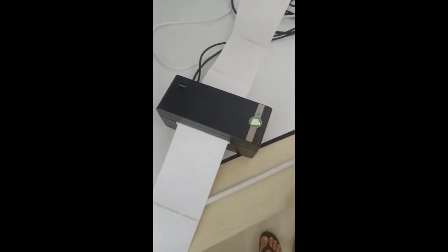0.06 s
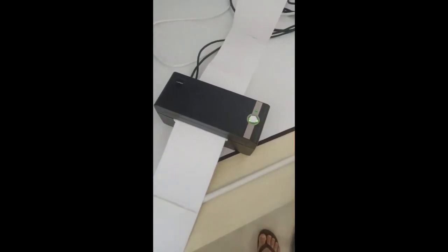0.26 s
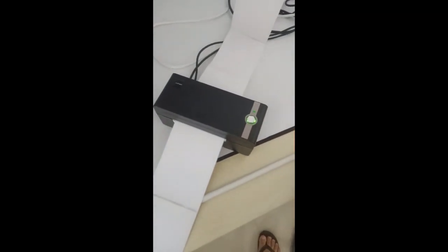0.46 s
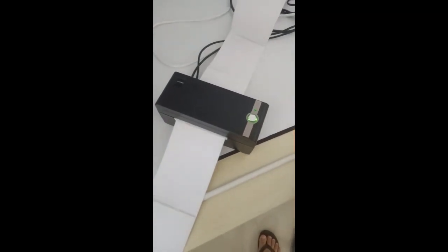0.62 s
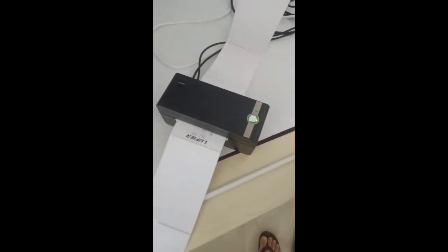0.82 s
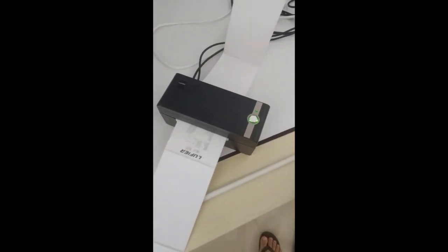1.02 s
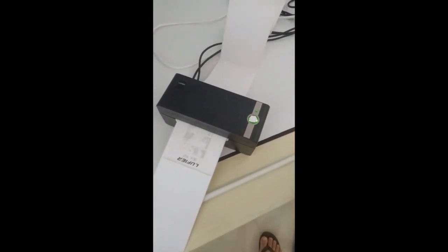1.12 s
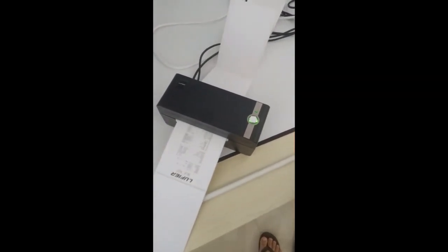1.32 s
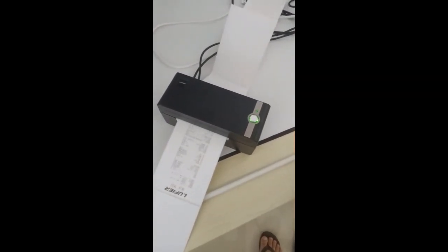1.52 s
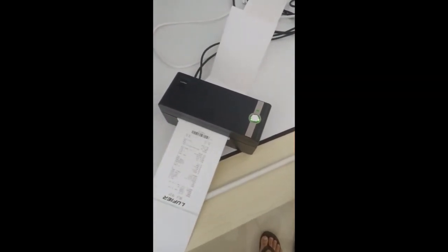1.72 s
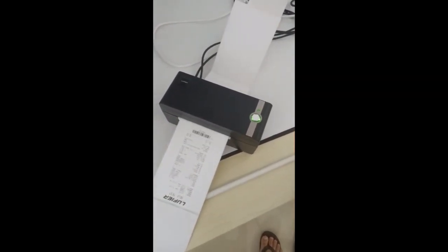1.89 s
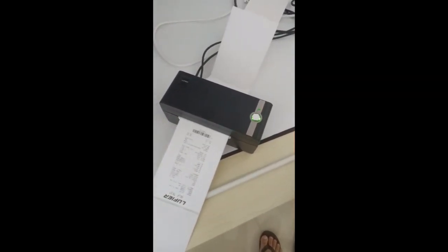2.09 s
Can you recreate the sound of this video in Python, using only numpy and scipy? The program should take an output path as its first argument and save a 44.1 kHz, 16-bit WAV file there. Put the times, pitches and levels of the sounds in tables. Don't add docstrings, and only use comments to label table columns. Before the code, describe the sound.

Small label printer whirs with a buzzing motor whine, feeding paper after rustles and dry clicks

```python
import sys
import numpy as np
from scipy import signal
from scipy.fft import rfft, irfft, next_fast_len
from scipy.io import wavfile
from scipy.ndimage import uniform_filter1d, map_coordinates

SR = 44100
rng = np.random.default_rng(int(sys.argv[2]) if len(sys.argv) > 2 else 0)


def store_wav(level_fs):
    pcm = np.round(np.clip(np.atleast_2d(level_fs), -1, 1) * 32767)
    wavfile.write(sys.argv[1], SR, pcm.T.astype(np.int16))


def gain_from_db(level_db):
    decades = np.asarray(level_db, float) / 20
    return 10 ** decades


N = 94815
T = np.arange(N) / SR
STEP_HZ, CYCLE_STEPS = 1197.7, 6
GEAR_STEPS, GEAR_MARK_S = 26, 1.456
START_S, STOP_S = .702, 1.79
# centre_hz, width_hz, level_db
SHEET_MODES = [(1330, 410, 2.5), (1604, 240, 5)]


def unit(x):
    return x / np.sqrt(np.mean(x ** 2) + 1e-20)


def along(points, hz):
    f, v = np.transpose(points)
    return np.interp(np.log(hz + 1), np.log(f + 1), v)


def level(rows):
    s, db = np.transpose(rows)
    return gain_from_db(np.interp(T, s, db, left=-120, right=-120))


def wobble(rate_hz):
    knots = rng.standard_normal(int(N * rate_hz / SR) + 4)
    return map_coordinates(knots, [T * rate_hz])


def filtered(x, response):
    m = next_fast_len(N + SR // 2)
    return irfft(rfft(x, m) * response(np.fft.rfftfreq(m, 1 / SR)), m)[..., :N]


def shape(points):
    return lambda hz: gain_from_db(along(points, hz))


def modes(table):
    def response(f):
        total = 0
        for k, (centre, width, db) in enumerate(table):
            damping = 1j * f * width
            total = total + (-1) ** k * gain_from_db(db) * damping / (centre * centre - f * f + damping)
        return total
    return response


def rush(colour, patchy_db):
    # hz, left_right_likeness
    likeness = [(60, 0.98), (180, 0.96), (350, 1), (700, 0.3), (1600, 0.1), (5000, 0.014)]
    z = signal.stft(rng.standard_normal((2, N + 512)), nperseg=512)[2]
    field = uniform_filter1d(rng.standard_normal(z.shape[1:]), size=5, axis=0)
    field = uniform_filter1d(field, size=6, axis=1)
    pair = signal.istft(z * gain_from_db(patchy_db * unit(field)), nperseg=512)[1][:, :N]

    def mid_side(hz):
        angle = np.arccos(np.clip(along(likeness, hz), 0, 1)) / 2
        return colour(hz) * np.array([np.cos(angle), np.sin(angle)])
    mid, side = filtered(pair, mid_side)
    return np.array([mid + side, mid - side]) / np.sqrt(np.mean(mid ** 2))


def desk(patchy_db):
    # centre_hz, width_hz, level_db
    desk_modes = [(43.6, 21, -6.5), (94.8, 14.9, 1.5), (139.8, 10.5, -1), (167.7, 16.5, -3)]
    return rush(lambda f: modes(desk_modes)(f) ** 2, patchy_db)


def room_floor():
    # hz, db_per_hz
    floor_colour = [(150, -15.5), (270, -8.5), (900, -16.5), (4200, -26), (5300, -40), (9500, -40),
                    (11800, -46), (12400, -61)]
    return gain_from_db(-63.5) * rush(shape(floor_colour), patchy_db=1.85) + gain_from_db(-65.5) * desk(patchy_db=1.8)


def room(x):
    # hz, t60_s
    decay = [(200, 0.63), (2000, 0.98), (9000, 0.8), (12000, .2)]
    hz, t, z = signal.stft(rng.standard_normal((2, SR // 2)), SR, nperseg=256)
    tail = signal.istft(z * gain_from_db(-60 * t / along(decay, hz)[:, None]), SR, nperseg=256)[1]
    tail = tail / np.linalg.norm(tail[0])
    delayed = np.pad(x, (300, 0))[None]
    return signal.fftconvolve(delayed, tail, axes=1)[:, :N]


def sway():
    centre_s, half_s, peak_db = 0.79, .4, -66
    swell = gain_from_db(peak_db) * np.exp(-((T - centre_s) / half_s) ** 2)
    return swell * rush(lambda f: modes([(46, 16, 0)])(f) ** 2, patchy_db=-2.0)


def shuffle():
    # start_s, level_db
    motion = [(.12, -98), (.175, -59), (.185, -70.5), (.25, -63.5), (.3, -55), (.45, -56), (.52, -64),
              (.6, -69), (.64, -55), (.675, -53.5), (.69, -53.5), (.76, -56), (.88, -64), (1.0, -58),
              (1.55, -58.5), (1.7, -57.5), (1.78, -54), (1.9, -62), (2.05, -71.5)]
    # centre_hz, width_hz, level_db
    paper_modes = [(248, 17.5, -5), (377.6, 17.5, 1), (480, 29, 0), (550, 26, -2), (678, 105, -0.5),
                   (970, 745, -11)]
    # start_s, level_db
    shaking = [(.15, -80), (.18, -51), (.24, -63), (.3, -53.5), (.37, -58.5), (.45, -58), (.56, -66),
               (.63, -56.5), (.71, -50), (.76, -68), (.95, -65.5), (1.4, -65.5), (1.6, -76), (1.85, -63),
               (1.91, -55), (1.96, -61), (2.1, -66)]
    flutter = gain_from_db(1.5 * wobble(60))
    drag = flutter * level(motion) * rush(modes(paper_modes), patchy_db=2.0)
    return drag + level(shaking) * desk(patchy_db=0.4)


def scrapes():
    # start_s, level_db, rise_s, hold_s, t60_s
    bursts = [
        (0.172, -59, 0.0011, 0.0027, 0.13),
        (0.2603, -60, 0.00098, 0.0064, 0.16),
        (0.279, -57.5, .0015, 0.0035, 0.1),
        (0.286, -63, 0.0018, 0.0043, 0.31),
        (0.336, -58.5, 0.02, 0.027, 0.39),
        (0.607, -51.5, 0.0042, 0.018, 0.029),
        (0.6287, -57, .001, 0.0097, 0.039),
        (0.635, -60, 0.00091, 0.0029, 0.073),
        (0.642, -63, 0.0039, 0.069, 0.27),
        (1.725, -60, 0.011, 0.024, 0.59),
    ]
    # hz, db_per_hz
    friction_colour = [(530, -42), (900, -10.5), (1550, -3.5), (2560, 1.5), (2740, -3.5), (4260, -5),
                       (6370, -18), (8880, -11.5), (15300, -42)]
    env = np.zeros(N)
    for start_s, db, rise_s, hold_s, t60_s in bursts:
        fall_db = 60 * np.clip(T - start_s - rise_s - hold_s, 0, None) / t60_s
        env += gain_from_db(db - fall_db) * np.clip((T - start_s) / rise_s, 0, 1)
    return env * gain_from_db(0.82 * wobble(900)) * rush(shape(friction_colour), patchy_db=2.6)


def pulses(events):
    out, sag = np.zeros(N), .07
    for s, db, hz, cycles in events:
        u = np.clip((T - s) * hz / cycles, -4, 4)
        out -= gain_from_db(db) * np.exp(-3 * u ** 2) * np.cos(2 * np.pi * cycles * (u - sag * u ** 2))
    return out


def flaps():
    # centre_s, peak_db, pitch_hz, cycles
    flexes = [(.178, -48, 170, 3.4), (0.185, -46.5, 344, 1.6), (0.202, -47.5, 320, 1.45),
              (.26, -50.5, 173, 3.2), (.29, -47, 726, 5), (.2945, -37.5, 624, 0.41), (.313, -43, 390, 0.97),
              (.333, -45.5, 478, 5.3), (.346, -50, 630, 2), (.3965, -47, 654, 5.8), (.4042, -40, 508, 5.9),
              (.415, -45, 536, 1.5), (.421, -47, 370, 5.2), (.445, -54, 480, 11), (0.461, -53.5, 253, 13),
              (.64, -40, 437, 0.82), (.65, -61, 306, 1.2), (.6597, -37, 580, 1.36), (.665, -43.5, 433, 2.1),
              (.688, -61, 130, 0.22), (.69, -59, 486, 23), (1.713, -41, 730, 2), (1.7172, -43, 640, 2.5),
              (1.7222, -36.5, 594, 1.5), (1.7356, -31, 764, 2.75), (1.749, -46.5, 453, 1.9),
              (1.757, -48, 377, 3.7), (1.807, -46.5, 556, 3), (1.86, -53, 244, 7.4), (1.88, -47.5, 496, 4)]
    return pulses(flexes)


def ticks():
    # centre_s, peak_db, pitch_hz, cycles
    clicks = [(.1715, -59, 3500, 2.4), (.176, -54, 4400, 7.5), (.181, -62, 4200, 6.1),
              (0.2655, -48, 4540, 3.3), (0.2714, -52, 4200, 17), (0.2824, -43, 3600, 3.4),
              (.289, -49, 3780, 4.5), (0.293, -51, 4150, 9.2), (.3, -57, 4160, 3.5), (0.313, -54, 4180, 10),
              (0.358, -50, 3470, 5.1), (.613, -41, 3560, 2.9), (0.626, -38.5, 4140, 3.3),
              (0.6294, -40, 3570, 3.3), (0.6322, -36.5, 4130, 5.1), (.638, -48, 4040, 13),
              (1.71, -36, 1210, 1.5), (1.7219, -39, 1530, 2), (1.737, -42, 1300, 0.84)]
    return pulses(clicks)


def gate(fall_s):
    rise_s = 0.0022
    return np.clip((T - START_S) / rise_s, 0, 1) * np.exp(-np.clip(T - STOP_S, 0, None) / fall_s)


def teeth():
    tooth_db = [0, -6, -4]
    scatter_db = 2.5
    k = np.arange(-60, 40)
    at_s = GEAR_MARK_S + k * GEAR_STEPS / STEP_HZ / len(tooth_db)
    taps = np.zeros(N)
    tap_db = np.take(tooth_db, k, mode="wrap") + scatter_db * rng.standard_normal(len(k))
    taps[(at_s * SR).astype(int)] = gain_from_db(tap_db)
    ring = filtered(taps, lambda f: modes(SHEET_MODES)(f) ** 2)
    tapped = ring[taps.cumsum() > 0][:SR // 2]
    return ring / np.sqrt(np.mean(tapped ** 2))


def sheet_buzz():
    # start_s, level_db
    buzz_level = [(1.12, -70), (1.3, -61), (1.5, -60), (1.6, -64), (1.72, -60), (1.76, -77)]
    friction = gain_from_db(1 + 3 * wobble(90)) * rush(modes(SHEET_MODES), patchy_db=-2.5)
    return level(buzz_level) * (teeth() + friction)


def gears():
    # hz, db_per_hz
    gear_colour = [(500, -30), (900, -21), (1800, -17), (3000, -11.5), (4200, -19.5), (5300, -29),
                   (9500, -25), (15300, -43)]
    level_db, step_depth, cycle_depth = -57.5, 0.17, .3
    cycle = 2 * np.pi * STEP_HZ / CYCLE_STEPS * T
    step_pulse = 1 + step_depth * np.sin(CYCLE_STEPS * cycle)
    cycle_pulse = 1 + cycle_depth * (np.cos(cycle) + .5 * np.cos(2 * cycle))
    drift = gain_from_db(level_db + 0.09 * wobble(6.1) + 1.1 * wobble(150))
    return gate(fall_s=.03) * drift * step_pulse * cycle_pulse * rush(shape(gear_colour), patchy_db=1.0)


def lock_in():
    # step_rate_multiple, level_db
    overtones = [(3, -56), (4, -65)]
    centre_s, width_s = .737, .014
    swell = np.exp(-((T - centre_s) / width_s) ** 2)
    return swell * sum(gain_from_db(db) * np.sqrt(2) * np.sin(2 * np.pi * k * STEP_HZ * T) for k, db in overtones)


def favoured(order):
    # order, centre_s, half_length_s, gain_db
    favours = [(2, 1.19, 0.37, 4.5), (2, 1.47, .08, -16), (2, 0.8, 0.086, -8), (4, 1.39, 0.087, 6.5),
               (4, 1.645, 0.058, 8.5), (8, 1.47, 0.18, 2.5), (8, .8, .15, -14), (10, 1, .15, -14),
               (12, 1.21, 0.13, 3.5), (12, 1.733, 0.034, -14), (13, 1.53, .07, 8), (13, 0.8, .1, 4),
               (15, 1.2, 0.085, 5), (16, 1.204, 0.14, 15), (16, 1.43, 0.072, 10), (16, 0.97, 0.051, -5),
               (17, 0.923, 0.02, 10), (17, 0.987, 0.072, 5.5), (17, 1.5, .08, 1.5), (17, .75, 0.037, -1),
               (18, 1, 0.025, 14), (18, 1.1, 0.039, -3), (19, 1.13, 0.057, 7.5), (19, 1.61, 0.17, 6.5),
               (19, 1.44, .07, -9), (19, 0.97, 0.033, -12), (20, 1.22, .07, 9), (21, 1.35, .07, 6),
               (21, 1.0, .04, 7), (39, 0.73, .03, -25), (39, 1.35, 0.06, -8), (39, 1.1, 0.027, 2),
               (39, 1.66, .06, 4), (39, 1.84, 0.041, -14), (4, 1.64, 0.035, -4.5), (8, 4.4, .06, -8)]
    return gain_from_db(sum(db * np.exp(-((T - s) / half_s) ** 2) for k, s, half_s, db in favours if k == order))


def wandering_tone(clock_s, hz, wander_db, apart_rad, start_rad=0):
    rate_hz, phase_wander_rad = 40, .32
    sides = []
    for side in (-1, 1):
        gain = gain_from_db(wander_db * wobble(rate_hz)) * np.sqrt(2)
        phase = 2 * np.pi * hz * clock_s + phase_wander_rad * wobble(rate_hz)
        sides.append(gain * np.sin(phase + side * apart_rad + start_rad))
    return np.array(sides)


def whine():
    # start_s, level_db
    step_level = [(.722, -72), (.736, -55), (.9, -57), (1.15, -55), (1.22, -52), (1.4, -50.5), (1.586, -51),
                  (1.598, -40), (1.632, -39.5), (1.638, -43), (1.655, -45), (1.67, -49), (1.702, -52),
                  (1.712, -64), (1.75, -64), (1.762, -53), (1.78, -66), (1.95, -72)]
    # order, rms_db
    order_levels = [(2, -65.5), (3, -65), (4, -66), (8, -68), (10, -65.5), (11, -70.5), (12, -59),
                    (13, -66), (14, -77), (15, -69), (16, -70), (17, -67), (18, -70.5), (19, -69),
                    (20, -74), (21, -75), (25, -78), (39, -72.5), (42, -77)]
    # pitch_hz, rms_db
    roller = [(380, -69.5), (482, -68.5), (1566, -74), (3070, -72.5)]
    from_speed, spinup_s, tremble_depth = .85, 0.01202, .11
    speed = 1 - (1 - from_speed) * np.exp(-np.clip(T - START_S, 0, None) / spinup_s)
    clock_s = np.cumsum(speed) / SR
    lines = [(k * STEP_HZ / CYCLE_STEPS, gain_from_db(db) * favoured(k)) for k, db in order_levels]
    lines += [(hz, gain_from_db(db)) for hz, db in roller]
    orders = np.zeros((2, N))
    for hz, gain in lines:
        apart_rad, start_rad = rng.uniform(0.18, 1.0), rng.uniform(0, 2 * np.pi)
        orders += gain * wandering_tone(clock_s, hz, 1.9, apart_rad, start_rad)
    turn = 2 * np.pi * STEP_HZ / GEAR_STEPS * (T - GEAR_MARK_S)
    tremble = 1 + tremble_depth * (np.cos(turn) + np.cos(2 * turn))
    step = level(step_level) * wandering_tone(clock_s, STEP_HZ, .6, 0.19)
    return gate(fall_s=.035) * orders + step * gain_from_db(1.37 * wobble(120)) * tremble


def scene():
    near = gears() + sheet_buzz() + scrapes() + flaps() + ticks()
    answer = gain_from_db(-7) * room(near.mean(0))
    return near + answer + whine() + lock_in() + shuffle() + sway() + room_floor()


def low_pass(x):
    return signal.sosfilt(signal.butter(12, 15470, fs=SR, output="sos"), x)


def record(dry):
    # hz, left_minus_right_db
    sides = [(60, -2), (150, -2), (380, -6.5), (940, -3.5), (2370, -5.5), (4400, -11.5), (7000, 0),
             (14900, 1)]
    low_cut_hz = 26

    def microphones(hz):
        balance = gain_from_db(along(sides, hz) * np.array([[.5], [-.5]]))
        return balance / (1 + (low_cut_hz / (hz + 1)) ** 4)
    return low_pass(filtered(dry, microphones))


dry = scene()
out = record(dry)
store_wav(out)
```